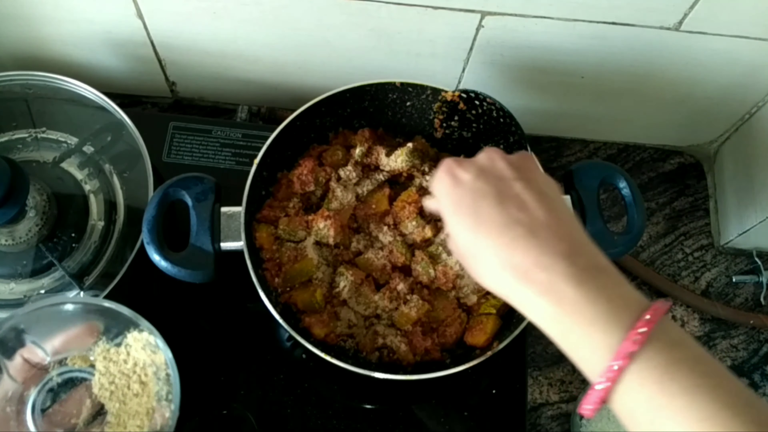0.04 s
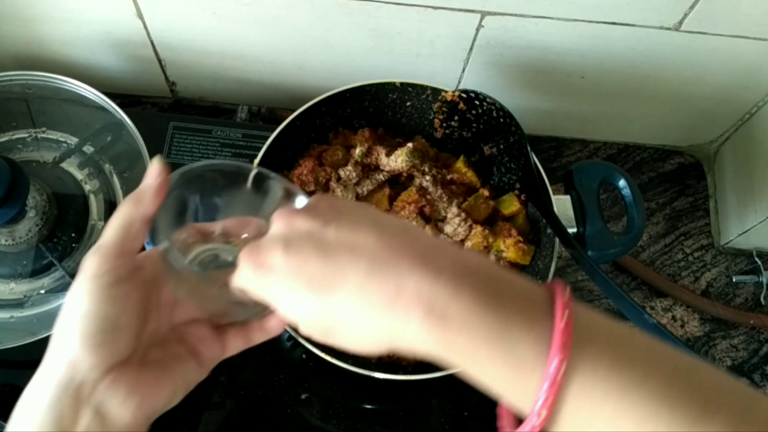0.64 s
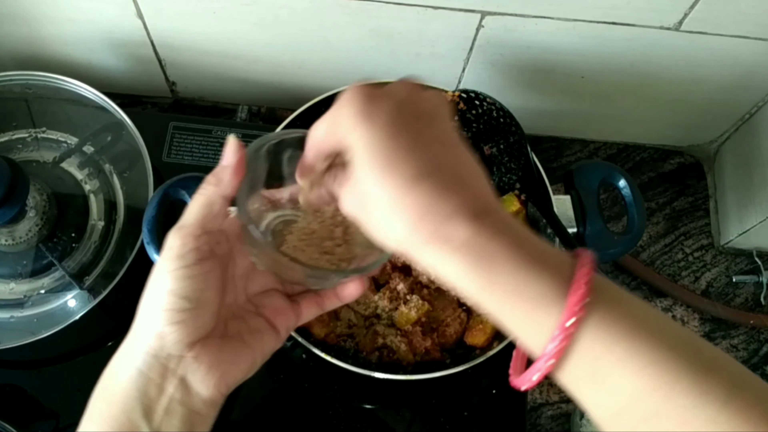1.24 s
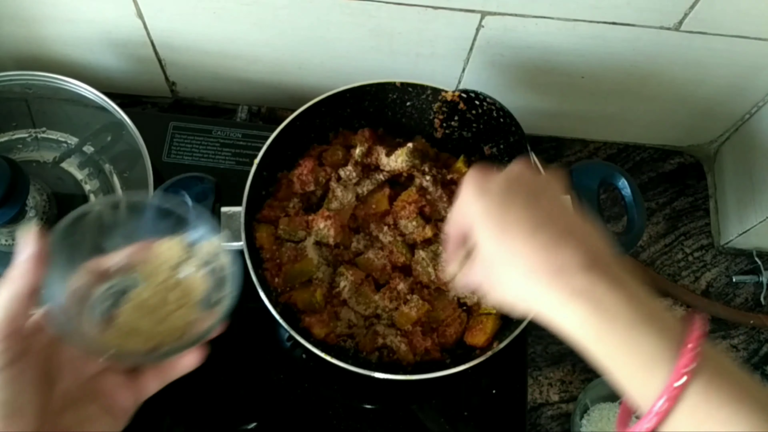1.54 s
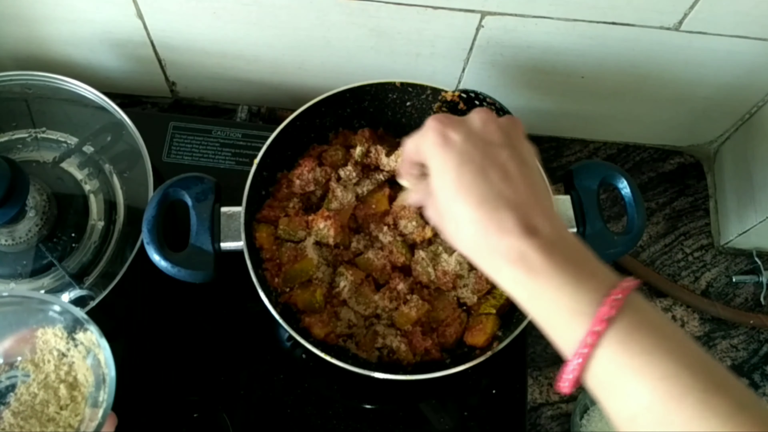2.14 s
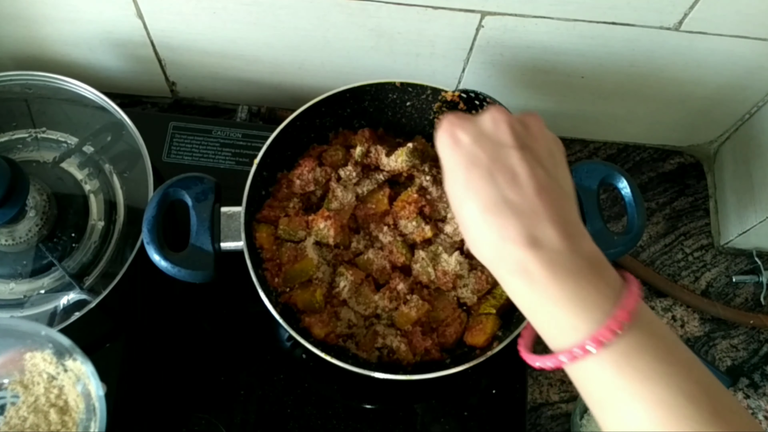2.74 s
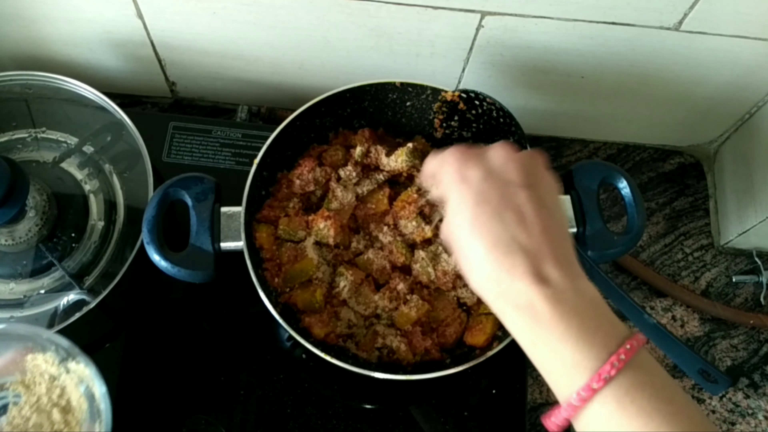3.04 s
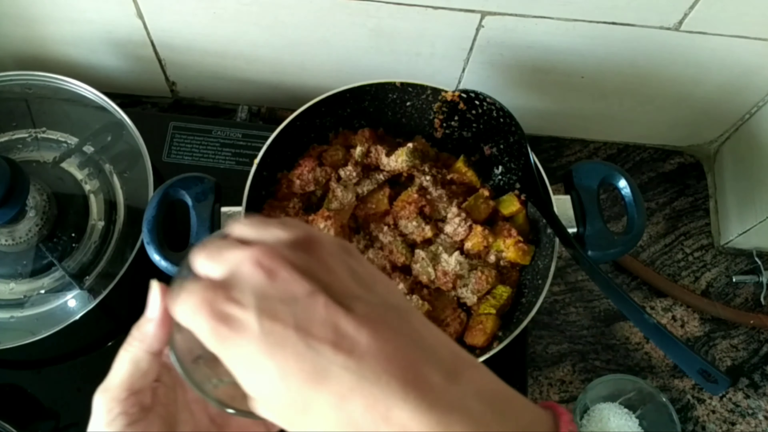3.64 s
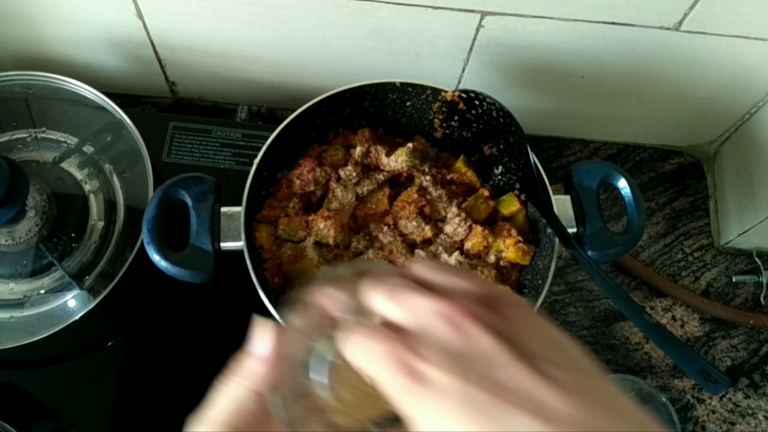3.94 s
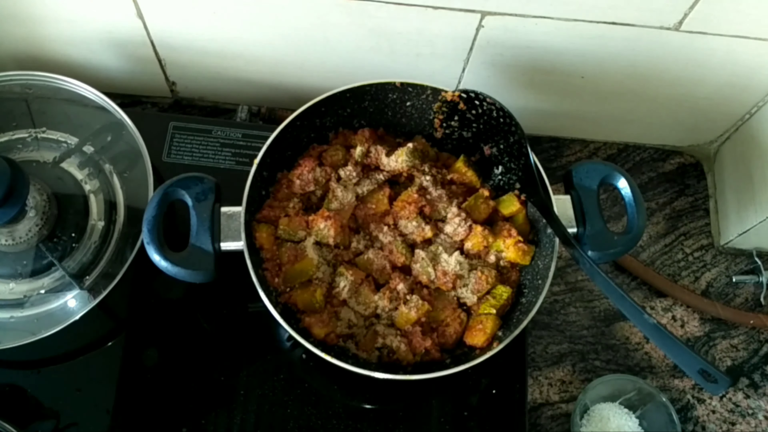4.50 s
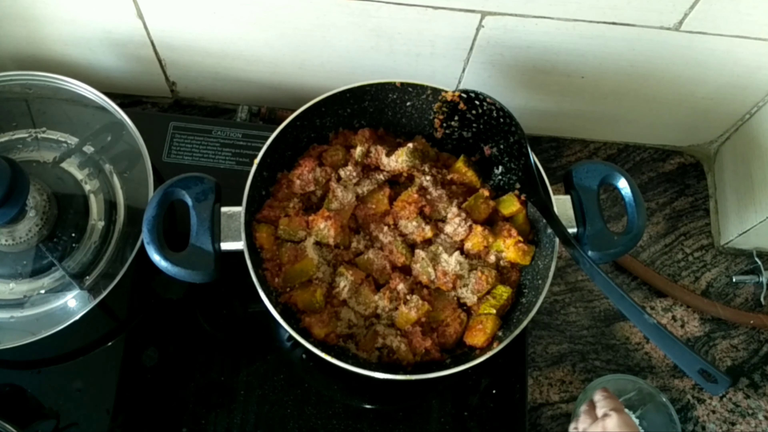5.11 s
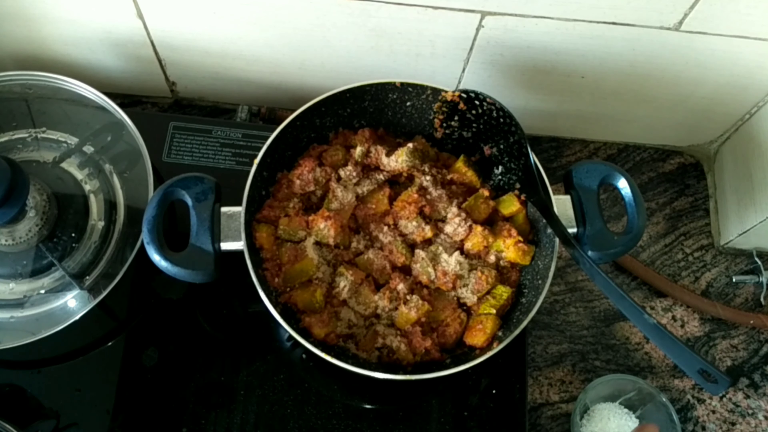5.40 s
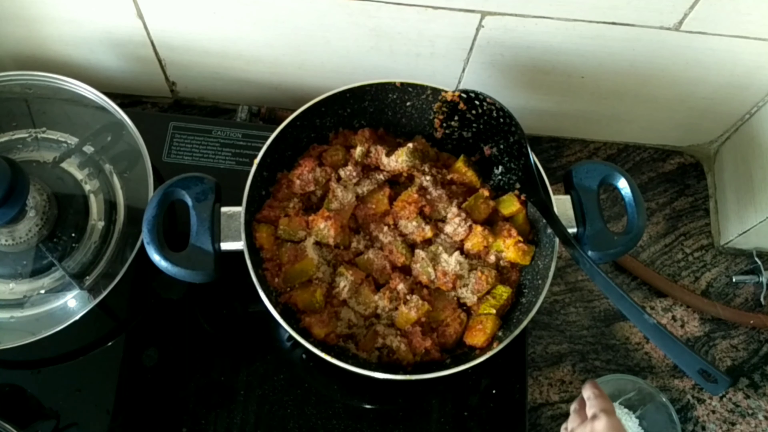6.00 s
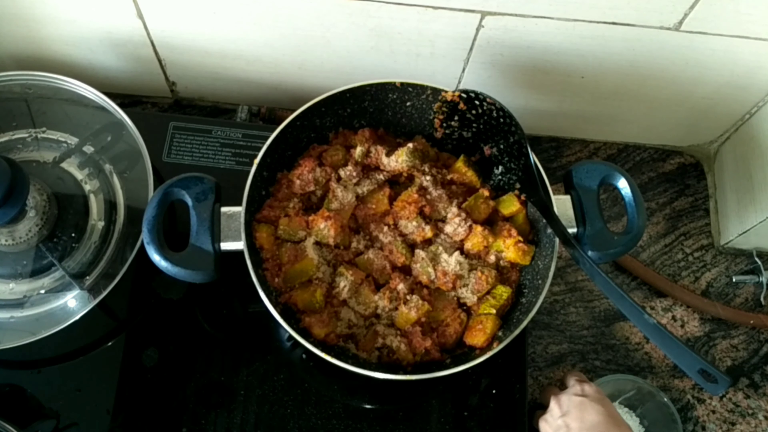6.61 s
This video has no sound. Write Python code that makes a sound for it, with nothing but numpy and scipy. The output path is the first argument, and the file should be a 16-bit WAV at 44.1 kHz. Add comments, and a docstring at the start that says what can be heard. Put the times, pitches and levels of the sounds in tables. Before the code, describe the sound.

Vegetables sizzle quietly in a pan throughout, heard from above the stove in a small tiled kitchen: a fine, high crackle with soft blips and plops of thick sauce over a low room drone. A finger taps a glass bowl at about 0.6 seconds. Three dull, low handling bumps follow around 1.2 seconds, with faint rubbing of dry spice that returns now and then. At 3.3 seconds comes one bright, sharp clink, probably a bangle on the glass, ringing briefly; it is the most prominent sound. Tiny, very high spits of oil cluster around 3.7 to 4.1 seconds. More soft bumps come near 5.4 to 5.7 seconds and at 6.3. At about 6.5 seconds a small dish knocks twice in quick succession on the stone counter. Very faint swishes in the first half and a few faint high chirps sit in the background.

```python
"""Vegetables sizzle quietly in a pan: steam bubbles burst in the oil, drops spit, sauce blips and plops.
In the small tiled kitchen a cook rubs spice from a glass bowl, with finger taps and soft handling bumps.
One bright clink, probably a bangle on the glass; near the end a small dish knocks twice on the stone
counter. Underneath: a low room drone, faint narrow rings, soft swishes and high chirps."""
import sys
import numpy as np
from scipy import signal
from scipy.fft import rfft, irfft, next_fast_len
from scipy.io import wavfile
from scipy.ndimage import map_coordinates

SR = 44100
rng = np.random.default_rng(int(sys.argv[2]) if len(sys.argv) > 2 else 0)


def wrap_up_sound(samples):
    """Save the sound to the file named by the first command line argument, as 16-bit audio."""
    columns = np.atleast_2d(samples).T
    # keep every value between -1 and 1, then stretch to whole-number steps
    tamed = np.clip(columns, -1, 1)
    steps = np.round(tamed * 32767).astype(np.int16)
    wavfile.write(sys.argv[1], SR, steps)


N = 297807
T = np.arange(N) / SR
AGE = T[:SR // 2]  # seconds since an event's onset


def undb(db):
    """Decibels to gain."""
    return 10 ** (np.asarray(db) / 20)


def unit(x):
    """Scale to rms 1."""
    return x / np.sqrt(np.mean(x ** 2))


def add(out, start_s, sound):
    """Mix a sound in at start_s, no earlier than 0."""
    start = max(int(start_s * SR), 0)
    part = sound[:max(N - start, 0)]
    out[start:start + len(part)] += part


def fade(t60_s):
    """Exponential decay, 60 dB in t60_s."""
    return np.exp(-np.log(1000) * AGE / t60_s)


def swell(rise_s):
    """Attack with time constant rise_s."""
    return 1 - np.exp(-AGE / rise_s)


def hump(length_s):
    """Smooth swell and fade."""
    return np.sin(np.pi * np.minimum(T / length_s, 1)) ** 2


def walk(rate_hz):
    """Smooth random drift, rms 1."""
    steps = rng.standard_normal(2048)
    return unit(map_coordinates(steps, [T * rate_hz], order=2, mode="wrap"))


def colour(x, spectrum):
    """Shape x by (Hz, dB) points; rms 1."""
    hz, db = np.transpose(spectrum)
    size = next_fast_len(len(x))
    bins_hz = np.maximum(np.fft.rfftfreq(size, 1 / SR), 1)
    gain = undb(np.interp(np.log(bins_hz), np.log(hz), db))
    return unit(irfft(rfft(x, size) * gain, size)[:len(x)])


def band(hz, width_hz, size=len(AGE)):
    """Noise in one steep-sided resonance, rms 1."""
    bins_hz = np.maximum(np.fft.rfftfreq(size, 1 / SR), 1)
    detune = (bins_hz / hz - hz / bins_hz) * hz / width_hz
    return unit(irfft(rfft(rng.standard_normal(size)) / (1 + detune ** 2), size))


def band_swell(hz, width_hz, length_s):
    """Noise band that swells and fades."""
    return band(hz, width_hz) * hump(length_s)[:len(AGE)]


def pop(hz, width_hz, t60_s):
    """One resonance set ringing; a narrow one builds up more slowly."""
    return band(hz, width_hz) * fade(t60_s) * swell(rise_s=0.5 / width_hz)


def ring(modes):
    """Decaying (Hz, dB, t60 s) modes at random phases."""
    tones = sum(undb(db) * np.sin(2 * np.pi * (hz * AGE + rng.random())) * fade(t60_s)
                for hz, db, t60_s in modes)
    onset_rms = np.sqrt(np.sum(undb(np.array(modes)[:, 1]) ** 2) / 2)
    return tones / onset_rms


def burst(spectrum, t60_s, rise_s):
    """Dense modes or reflections: coloured noise that builds and decays."""
    return colour(rng.standard_normal(len(AGE)), spectrum) * fade(t60_s) * swell(rise_s)


def grains(per_s, spread_db, smear_db, smear_t60_s):
    """Random clicks, most weak, a few strong, each with a diffuse tail; rms 1."""
    strength = undb(spread_db * np.minimum(rng.exponential(size=N), 5))
    clicks = (rng.random(N) < per_s / SR) * strength * rng.choice([-1, 1], N)
    tail_power = np.abs(signal.fftconvolve(clicks ** 2, fade(smear_t60_s) ** 2)[:N])
    return unit(clicks + undb(smear_db) * np.sqrt(tail_power) * rng.standard_normal(N))


def sizzle(steam_db=-5, fizz_db=-4, flicker_db=1.15, gain_db=2.0):
    """Steam bubbles burst in oil and echo in the pan; the finest fizz at the top; steam hisses between."""
    # Frying strength. Each row: time in seconds, level in dB before gain_db.
    frying_levels = [(0, -52.5), (.7, -52), (1.5, -53.5), (2.3, -52.5), (3.1, -54.5), (3.7, -51.5),
                     (4.5, -52.5), (6.75, -52)]
    # Pan and fizz spectra. Each row: frequency in Hz, relative density in dB.
    pan_spectrum = [(700, -16), (1000, -14.5), (1350, -18), (1700, -16.5), (3300, -10), (3850, -14),
                    (4300, -13), (6000, -12), (8000, -10), (11300, -5.5), (12700, 0), (13700, 1.5),
                    (15500, -5)]
    fizz_spectrum = [(7000, -21), (11000, -8.5), (13500, 0.5), (15500, -4)]
    crackle = grains(per_s=1300, spread_db=2.5, smear_db=-17.5, smear_t60_s=0.037)
    steam = undb(steam_db) * rng.standard_normal(N)
    fizz = colour(grains(per_s=450, spread_db=3.5, smear_db=-6, smear_t60_s=0.023), fizz_spectrum)
    frying = unit(colour(crackle + steam, pan_spectrum) + undb(fizz_db) * fizz)
    level_db = np.interp(T, *np.transpose(frying_levels)) + gain_db
    return frying * undb(level_db + flicker_db * walk(rate_hz=25))


def whine():
    """Faint, steady, narrow rings in the hiss."""
    # Each row: centre in Hz, width in Hz, level in dB.
    rings = [(1343, 130, -77.5), (3810, 160, -75.5)]
    return sum(undb(db) * band(hz, width_hz, size=next_fast_len(N))[:N] for hz, width_hz, db in rings)


def drone(level_db=-61.5, waver_db=2.0):
    """Low, wavering drone of the kitchen."""
    # Each row: frequency in Hz, relative density in dB.
    spectrum = [(25, -15), (45, -12), (70, -5), (100, 2), (130, -7), (200, -10.5), (250, -5), (310, -15),
                (400, -16), (560, -14), (800, -25), (1500, -27.5), (4000, -40.5)]
    return colour(rng.standard_normal(N), spectrum) * undb(level_db + waver_db * walk(rate_hz=8.2))


def swishes(count=4, first_s=0.062, every_s=1.004, length_s=0.155, hz=1680, width_hz=500, db=-65.5):
    """A few faint swishes at an even pace."""
    out = np.zeros(N)
    for middle_s in first_s + every_s * np.arange(count):
        add(out, middle_s - length_s / 2, undb(db) * band_swell(hz, width_hz, length_s))
    return out


def simmer(count=70, base_db=-65, low_hz=250, high_hz=1600, t60_cycles=60):
    """Thick sauce blips; larger bubbles are lower, louder and ring longer."""
    out = np.zeros(N)
    for when, pitch, strength in rng.random((count, 3)):
        hz = low_hz * (high_hz / low_hz) ** pitch
        blip = np.sin(2 * np.pi * hz * AGE) * fade(t60_cycles / hz) * swell(rise_s=0.0043)
        add(out, when * N / SR, undb(base_db + 9.0 * strength - 4 * pitch) * blip)
    return out


def plops(q=3.8, t60_s=0.21):
    """Large sauce bubbles burst, each ringing at its own pitch."""
    # Each row: start in seconds, level in dB, pitch in Hz.
    bubbles = [(.335, -56, 471), (.794, -52.5, 575), (1.681, -53, 292), (2.18, -50, 270), (3.005, -59, 510),
               (3.97, -55, 378), (4.81, -57, 750), (5.08, -57.5, 377), (5.203, -54, 364),
               (5.427, -46.5, 263), (6.021, -54.5, 382)]
    out = np.zeros(N)
    for start_s, db, hz in bubbles:
        add(out, start_s, undb(db) * pop(hz, hz / q, t60_s))
    return out


def taps():
    """A fingertip meets the bowl; the holding hand damps the ring."""
    # Each row: start in seconds, level in dB.
    touches = [(.608, -43), (1.445, -56)]
    # Held bowl. Each row: centre in Hz, width in Hz, relative level in dB, t60 in seconds.
    resonances = [(1356, 200, -1.5, 0.15), (2400, 3600, -13, 0.23), (273, 180, -12, 0.42)]
    out = np.zeros(N)
    for start_s, db in touches:
        tap = sum(undb(ring_db) * pop(hz, width_hz, t60_s) for hz, width_hz, ring_db, t60_s in resonances)
        add(out, start_s, undb(db) * tap)
    return out


def rustle(uneven_db=2.2, fidget_db=-76):
    """Fingers rub dry spice in uneven strokes and fidget between them."""
    # Each row: middle in seconds, level in dB, length in seconds.
    rubs = [(1.12, -66, .5), (1.498, -64, .26), (3.3, -73, 1), (4.28, -67, 0.65), (5.0, -68, 0.46),
            (5.4, -70, .5), (6.423, -68.5, 0.5)]
    # Dry spice. Each row: frequency in Hz, relative density in dB.
    spectrum = [(200, -8), (400, 5.5), (800, -4.5), (1400, 1.5), (2400, 1), (4000, -4), (8000, -11),
                (15000, -28)]
    rubbing = grains(per_s=900, spread_db=3.0, smear_db=-21.0, smear_t60_s=0.06)
    power = np.full(N, undb(fidget_db) ** 2)
    for middle_s, db, length_s in rubs:
        add(power, middle_s - length_s / 2, undb(db) ** 2 * hump(length_s))
    return colour(rubbing, spectrum) * np.sqrt(power) * undb(uneven_db * walk(rate_hz=14))


def spits():
    """Water drops burst in hot oil with a short, very high tick."""
    # Each row: start in seconds, level in dB.
    drops = [(.988, -46), (3.722, -36.5), (3.975, -39), (4.08, -41), (4.116, -43.5), (5.582, -40),
             (6.443, -43)]
    out = np.zeros(N)
    for start_s, db in drops:
        add(out, start_s, undb(db) * pop(hz=13300, width_hz=4500, t60_s=0.028))
    return out


def bumps(pushes=3, scatter=0.146, gap_s=0.037, step_db=-7.5, push_t60_s=0.11, thud_db=-16):
    """Handling bumps stir a hollow body; each settles in weaker, uneven, low-ringing pushes."""
    # Each row: start in seconds, level in dB, pitch in Hz.
    hits = [(1.157, -33.5, 105.6), (1.197, -34, 106), (1.294, -34.5, 102), (3.401, -49, 70),
            (3.867, -44.5, 85), (5.382, -36.5, 93.3), (5.513, -41.5, 73.6), (5.682, -45, 75),
            (6.291, -45.5, 77)]
    out = np.zeros(N)
    for start_s, db, hz in hits:
        add(out, start_s, undb(db + thud_db) * pop(hz=210, width_hz=106, t60_s=0.22))
        for k, (late, detune) in enumerate(scatter * rng.standard_normal((pushes, 2))):
            push_hz = hz * (1 + k * detune / 2)
            push = np.sin(2 * np.pi * push_hz * AGE) * fade(push_t60_s) * swell(rise_s=0.002)
            add(out, start_s + k * gap_s * (1 + late), undb(db + k * step_db) * push)
    return out


def chirps(hz=6900, width_hz=2000):
    """Faint, blurred chirps at one pitch, perhaps a bird outside."""
    # Each row: middle in seconds, level in dB, length in seconds.
    calls = [(1.931, -60.5, .15), (2.655, -56, 0.033), (4.519, -60, 0.083), (5.542, -59, .06),
             (5.762, -58, 0.084)]
    out = np.zeros(N)
    for middle_s, db, length_s in calls:
        add(out, middle_s - length_s / 2, undb(db) * band_swell(hz, width_hz, length_s))
    return out


def clink(ring_db=-17, room_db=-17):
    """A tiny, hard contact chatters on the glass and wakes its high modes; the tiles throw it back."""
    # Each row: start in seconds, level in dB.
    contacts = [(3.3094, -8.5), (3.3113, -7.5), (3.3152, -14), (3.327, -21), (3.37, -24)]
    # Each row: frequency in Hz, relative level in dB, t60 in seconds.
    bowl_modes = [(870, -25.5, 0.2), (2275, -25.5, 0.25), (2607, -13, 0.1), (2970, -32, 0.32),
                  (3340, -21, 0.13), (3830, -12, 0.16), (3970, -16, 0.18), (4670, -5, 0.091),
                  (5400, -17, 0.13), (6110, -22, 0.23), (6630, -7, 0.19), (6820, -9, 0.21),
                  (6670, -14, 0.2), (7470, -14, 0.27), (9400, -5.5, 0.16), (10600, -2, 0.17),
                  (12030, -9, 0.2), (12400, -11, 0.15), (12680, -6, 0.21), (12910, -6, .17),
                  (13470, -8, .18), (13660, 4, 0.19), (13650, -6, .19), (13900, -7, .18), (15200, -2, 0.17)]
    # Contact and reverberation spectra. Each row: frequency in Hz, relative density in dB.
    crack_spectrum = [(250, -30.5), (600, -40), (900, -43), (1600, -47), (3000, -24.5), (4200, -8),
                      (5500, -20), (6700, -1), (8200, -14), (10500, -4), (11500, -4), (12600, 4),
                      (13800, 3.5), (15500, 0)]
    room_spectrum = [(400, -24.5), (750, -30), (950, -16.5), (1700, -22.5), (2600, -16.5), (4000, -11),
                     (5000, -7), (6700, -3.5), (8200, -6), (10700, -2), (13500, 2.5), (15500, -5.5)]
    out = np.zeros(N)
    for start_s, db in contacts:
        add(out, start_s, undb(db) * burst(crack_spectrum, t60_s=0.047, rise_s=0.0002))
    glass = undb(ring_db) * ring(bowl_modes) * swell(rise_s=0.0015)
    tiles = undb(room_db) * burst(room_spectrum, t60_s=0.25, rise_s=0.0077)
    add(out, contacts[0][0], glass + tiles)
    return out


def knocks(ring_db=-4, room_db=-1.5, echo_s=0.0061, echo_db=6, low_hz=290):
    """The dish lands on one edge, then the other; a near wall slaps back before the room rings."""
    # Each row: start in seconds, level in dB.
    landings = [(6.5415, -18.5), (6.6138, -19)]
    # Each row: frequency in Hz, relative level in dB, t60 in seconds.
    dish_modes = [(379.6, -5.5, 0.17), (429.6, -9.5, 0.2), (471, -6.5, 0.18), (1044, -5.5, 0.18),
                  (1122, -4, 0.1), (1150, -8, 0.16), (1285, -6, 0.13), (1430, -6, 0.19), (1493, 3.5, 0.17),
                  (1732, 0.5, 0.21), (1827, -12, 0.22), (1833, -4, 0.25), (2190, -14, 0.34),
                  (2401, -21, 0.22), (2665, -7, 0.14), (3560, -13, 0.21)]
    # Dish on stone. Each row: frequency in Hz, relative density in dB.
    spectrum = [(150, -36), (300, -15), (400, -7), (500, -5.5), (720, -14), (1050, -3.5), (1450, 3),
                (2000, -4), (2600, -5.5), (3000, -12.5), (3700, -16.5), (4600, -32), (7000, -49),
                (12000, -65)]
    out = np.zeros(N)
    for start_s, db in landings:
        crack = burst(spectrum, t60_s=0.04, rise_s=0.00091)
        dish = undb(ring_db) * ring(dish_modes) * swell(rise_s=0.0017)
        room = undb(room_db) * burst(spectrum, t60_s=0.21, rise_s=0.02)
        slap = undb(echo_db) * burst(spectrum, t60_s=0.011, rise_s=0.001)
        add(out, start_s, undb(db) * (crack + dish + room))
        add(out, start_s + echo_s, undb(db) * slap)
    # High-pass at low_hz: light knocks, no bass thump.
    return signal.sosfilt(signal.butter(4, low_hz, "high", fs=SR, output="sos"), out)


def scene():
    """All sources in mono, heard above the stove."""
    stove = sizzle() + simmer() + whine() + plops() + spits()
    cook = rustle() + clink() + knocks() + bumps() + taps()
    return (stove + cook + drone() + chirps() + swishes())[None]


def record(dry, low_hz=38, top_hz=15540):
    """Thin the deepest bass; cut the top steeply."""
    thinned = signal.sosfilt(signal.butter(2, low_hz, "high", fs=SR, output="sos"), dry)
    return signal.sosfilt(signal.ellip(12, 0.1, 80, top_hz, fs=SR, output="sos"), thinned)


dry = scene()
out = record(dry)
wrap_up_sound(out)
```